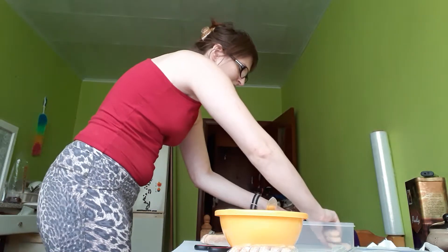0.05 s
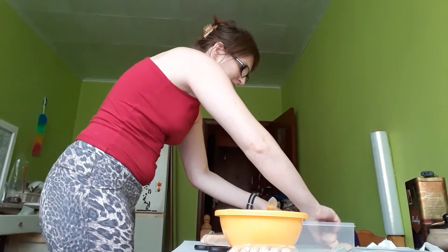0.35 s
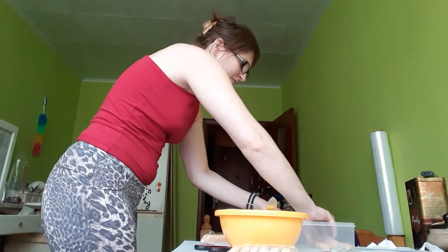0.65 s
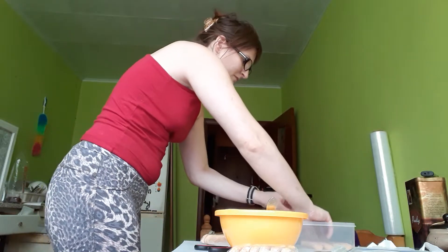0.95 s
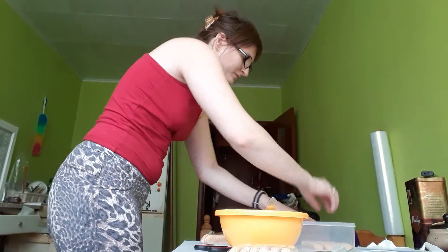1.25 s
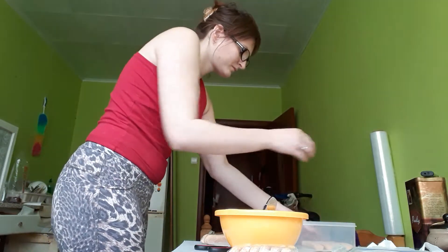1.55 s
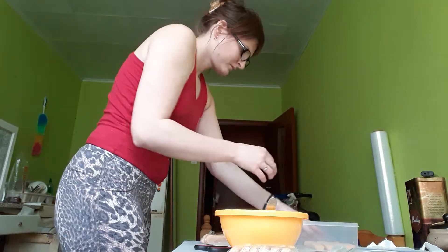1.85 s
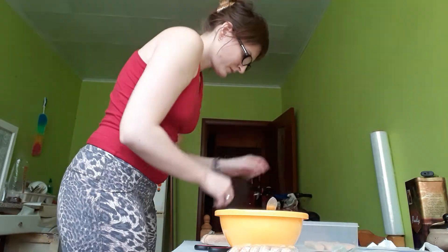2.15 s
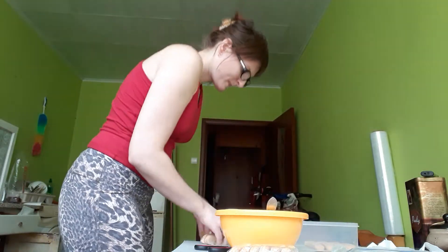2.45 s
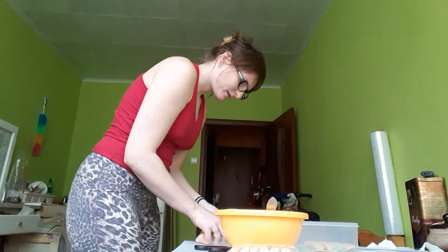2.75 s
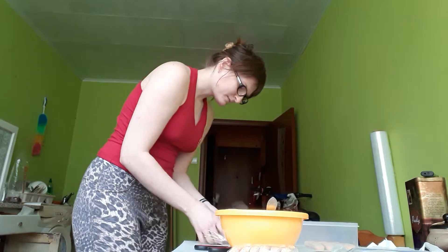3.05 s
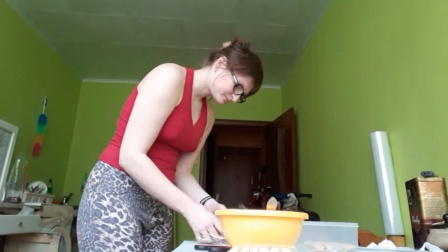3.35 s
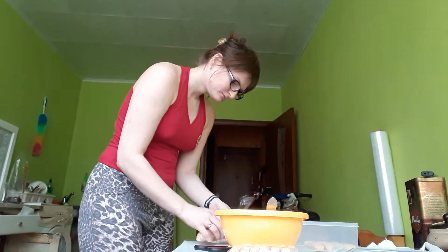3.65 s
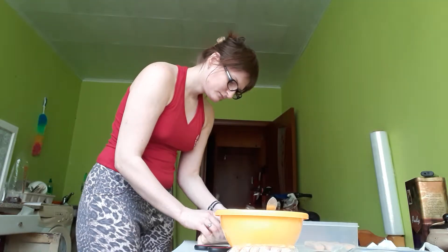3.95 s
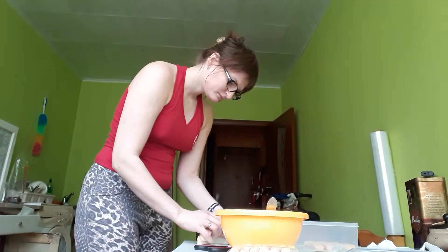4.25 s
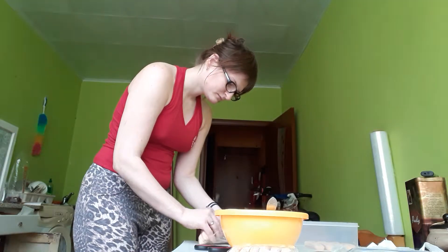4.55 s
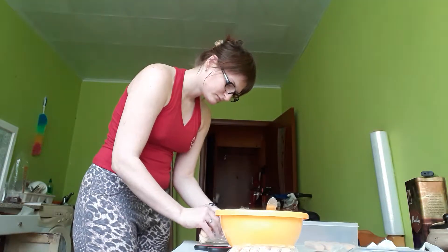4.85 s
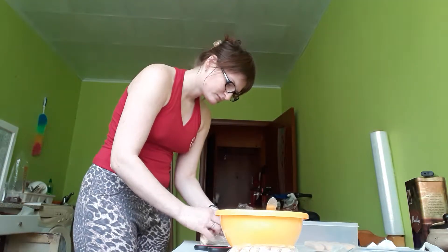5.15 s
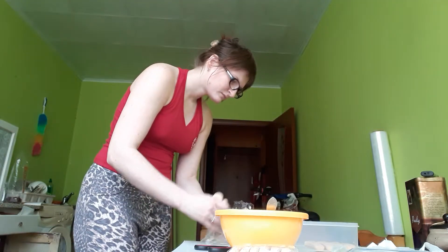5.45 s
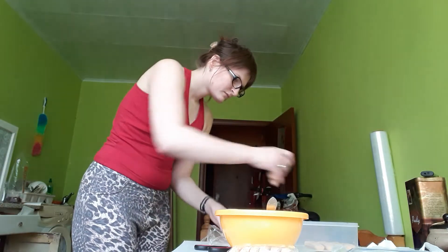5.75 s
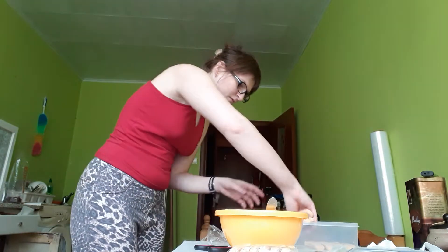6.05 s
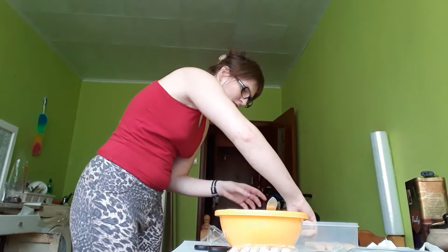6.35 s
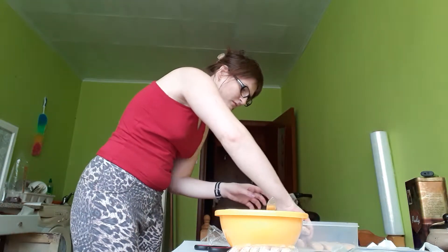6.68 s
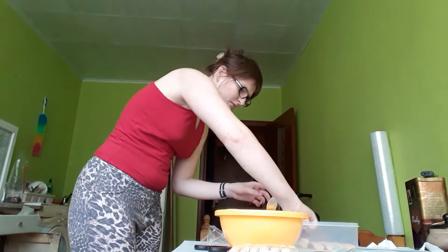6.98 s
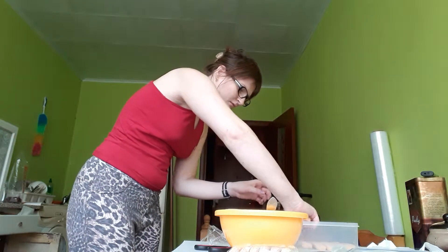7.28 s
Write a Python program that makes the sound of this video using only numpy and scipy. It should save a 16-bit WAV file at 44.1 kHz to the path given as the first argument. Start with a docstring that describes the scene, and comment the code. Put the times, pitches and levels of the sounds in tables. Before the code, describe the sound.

Dry biscuits are nudged around in a plastic box, making hollow knocks and short sandy scrapes. A hand then digs in a thin plastic bag, which crinkles and ticks as biscuits rub inside, with a few light bumps against a bowl. More biscuits drop into the box and are pushed into place. The sounds are close, with the short echo of a small kitchen and a faint fridge hum.

```python
"""Ladyfingers into a plastic box

Dry biscuits are nudged about in a plastic box on a kitchen table; each contact rings its hollow floor.
A hand digs more out of a crinkling plastic bag, bumps the bowl beside it and drops them into the box.
The small hard-walled kitchen echoes every sound, and a fridge hums."""
import sys
import numpy as np
from scipy import signal
from scipy.fft import rfft, irfft, next_fast_len
from scipy.io import wavfile
from scipy.ndimage import map_coordinates

SR = 44100
rng = np.random.default_rng(int(sys.argv[2]) if len(sys.argv) > 2 else 0)


def unload_wav(signal):
    """Save mono or channel-first audio to the path in sys.argv[1] as 16-bit WAV at rate SR, clipped to [-1, 1]."""
    wavfile.write(
        sys.argv[1],
        SR,
        np.round(np.clip(np.atleast_2d(signal).T, -1, 1) * 32767).astype(np.int16),
    )


N = 322674

# cracking sugar crust: (frequency [Hz], level [dB])
CRUST_SPECTRUM = [(100, -50.5), (300, -21.5), (1200, 7.5), (1950, 3), (2370, 4.5), (2800, 2), (4100, -4.5),
                  (5000, -16.5), (8000, -19), (12000, -31.5), (16000, -34)]
# snapping plastic: (frequency [Hz], level [dB])
CREASE_SPECTRUM = [(100, -43), (400, -34), (1200, -52), (2500, -6), (6500, 7.5), (10000, 7.5),
                   (16000, -10.5)]


def amp(db):
    """Decibels to gain."""
    return 10 ** (np.asarray(db) / 20)


def along(points, hz):
    """Interpolate (frequency [Hz], value) points on a log axis."""
    knots_hz, values = np.transpose(points)
    return np.interp(np.log(hz + 1), np.log(knots_hz), values)


def wobble(rate_hz):
    """Smooth random curve, rate_hz knots a second."""
    knots = rng.standard_normal(int(N * rate_hz / SR) + 4)
    return map_coordinates(knots, [np.arange(N) * rate_hz / SR])


def filtered(x, response):
    """Apply a frequency response."""
    n = x.shape[-1]
    size = next_fast_len(n + SR // 10)
    return irfft(rfft(x, size) * response(np.fft.rfftfreq(size, 1 / SR)), size)[..., :n]


def coloured(x, spectrum):
    """Impose a spectrum; scale to rms 1."""
    shaped = filtered(x, lambda hz: amp(along(spectrum, hz)))
    return shaped / np.sqrt(np.mean(shaped ** 2) + 1e-20)


def low_cut(x, corner_hz):
    """Small light bodies radiate little bass."""
    return signal.sosfilt(signal.butter(2, corner_hz, "highpass", fs=SR, output="sos"), x)


def add(track, time_s, sound):
    """Mix a stereo sound into the track."""
    part = track[:, max(0, round(time_s * SR)):][:, :sound.shape[1]]
    part += sound[:, :part.shape[1]]


def onset(rise_s):
    """Build-up of contact force."""
    return 1 - np.exp(-(np.arange(SR // 2) / SR / rise_s) ** 2)


def fade(t60_s):
    """Half a second of exponential decay."""
    return amp(-60 * np.arange(SR // 2) / SR / t60_s)


def stroke(start_s, length_s, rise_share, release_s, sag_db=4.5):
    """Envelope of a hand move: press, ease off, let go."""
    t = np.maximum(np.arange(N) / SR - start_s, 0)
    press = np.minimum(t / (rise_share * length_s), 1)
    ease = amp(-sag_db * np.minimum(t / length_s, 1))
    release = np.exp(-np.clip(t - length_s, 0, 1) / release_s)
    return press * ease * release


def ring(modes, scatter_db, detune):
    """Struck modes at peak 1; contact point and load reweight and retune them on each hit."""
    t = np.arange(SR // 2) / SR
    x = np.zeros(len(t))
    for k, (hz, db, t60_s) in enumerate(modes):
        gain = (-1) ** k * amp(db + scatter_db * rng.normal())
        tuned_hz = hz * (1 + detune * rng.normal())
        x += gain * fade(t60_s) * np.sin(2 * np.pi * tuned_hz * t)
    return x / np.abs(x).max()


def burst(spectrum, t60_s):
    """Decaying noise, starting near rms 1."""
    decay = fade(t60_s)
    crack = coloured(rng.standard_normal(SR // 2), spectrum) * decay
    return crack * np.linalg.norm(decay) / np.linalg.norm(crack)


def grains(spectrum, rate_hz, spread_db):
    """Random impulses of varying size, coloured, at rms 1."""
    strikes = rng.random(N) < rate_hz / SR
    signs = np.sign(rng.standard_normal(N))
    sizes = amp(spread_db * np.clip(rng.standard_normal(N), -2, 2))
    return coloured(strikes * signs * sizes, spectrum)


def placed(x, lead_ms, wet_db, pan_db, build_s):
    """Mono to stereo: direct path plus kitchen echoes. Positive lead and pan favour the left."""
    # room decay: (frequency [Hz], t60 [s])
    kitchen_decay = [(150, 0.63), (400, 0.23), (1000, 0.39), (3000, 0.36), (7000, 0.26), (15000, 0.19)]
    hz, t, noise = signal.stft(rng.standard_normal((2, SR // 2)), SR, nperseg=256)
    coherence = .95 * np.sinc(hz / 1250)  # close microphones share only long waves
    weights = np.sqrt([1 + coherence, 1 - coherence])[:, :, None]
    decay = amp(-60 * t / along(kitchen_decay, hz)[:, None])
    mid, side = signal.istft(noise * weights * decay, SR, nperseg=256)[1]
    build = np.minimum(np.arange(len(mid)) / SR / build_s, 1)
    tail = np.array([mid + side, mid - side]) * build
    echoes = signal.fftconvolve(x[None], tail / np.linalg.norm(tail[0]), axes=1)[:, :len(x)]
    direct = filtered(x, lambda hz: np.exp(1j * np.pi * np.outer([1, -1], hz) * lead_ms / 1000))
    return direct * amp([[pan_db / 2], [-pan_db / 2]]) + amp(wet_db) * echoes


def roaming(x, lead_ms, wet_db, pan_db, build_s):
    """Shifting source: new room paths every 50 ms."""
    out, step = np.zeros((2, N)), SR // 20
    for start in range(0, N, step):
        piece = x[start:start + step]
        if np.abs(piece).max() > 1e-5:
            padded = np.pad(piece, (0, SR // 3))
            shifted_ms = lead_ms + 0.05 * rng.normal()
            add(out, start / SR, placed(padded, shifted_ms, wet_db, pan_db, build_s))
    return out


def biscuit_slides():
    """Pushed biscuits stick and slip: the box rasps, the sugar scratches."""
    # pushes: (time [s], length [s], rasp [dB], scratch [dB])
    pushes = [(-.04, 0.19, -53, -59.5), (0.194, .19, -56.5, -56), (0.394, 0.051, -42, -56),
              (.54, 0.11, -45.5, -63.5), (0.69, 0.1, -38.5, -53.5), (0.837, 0.14, -46.5, -68),
              (0.998, 0.089, -53.5, -89.5), (1.529, 0.12, -66.5, -70), (1.595, 0.088, -42.5, -40),
              (1.694, 0.05, -39.5, -55), (6.296, 0.11, -60, -90), (6.457, 0.075, -45.5, -84),
              (6.494, 0.117, -38, -46.5), (6.841, 0.068, -40.5, -85), (6.909, 0.16, -44.5, -63.5),
              (7.109, 0.079, -43, -69), (7.236, 0.045, -40.5, -57.5)]
    # hollow box rasp: (frequency [Hz], level [dB])
    rasp_spectrum = [(30, -50.5), (150, -19), (300, -9.5), (500, -3.5), (740, 3), (1000, -6.5), (1600, -15),
                     (2500, -30.5), (4000, -48), (9000, -42)]
    # sandy sugar scratch: (frequency [Hz], level [dB])
    scratch_spectrum = [(200, -41), (800, 6.5), (1500, 3), (2500, 0), (4200, -4), (5500, -12),
                        (8000, -16.5), (11000, -22.5), (16000, -30)]
    rasp, scratch = np.zeros((2, N))
    for time_s, length_s, rasp_db, scratch_db in pushes:
        push = stroke(time_s, length_s, rise_share=0.18, release_s=0.013)
        rasp += amp(rasp_db - 2) * push
        scratch += amp(scratch_db + 1) * push
    rasp *= grains(rasp_spectrum, rate_hz=1000, spread_db=4.5)
    scratch *= grains(scratch_spectrum, rate_hz=3000, spread_db=7)
    friction = (rasp + scratch) * amp(0.31 * wobble(55))
    return roaming(friction, lead_ms=-0.1, wet_db=-2, pan_db=0.5, build_s=0.0062)


def fridge():
    """Steady hum, drifting slightly in level and phase."""
    # hum partials: (frequency [Hz], level [dB])
    partials = [(70, -83), (100, -66.5), (140, -76.5), (285, -91.5)]
    t = np.arange(N) / SR
    hum = np.zeros(N)
    for hz, db in partials:
        gain = np.sqrt(2) * amp(db + 0.34 * wobble(1.5))
        hum += gain * np.sin(2 * np.pi * hz * t + 0.05 * wobble(1.9))
    return hum * amp([[-.5], [.5]])


def room_air():
    """Faint air and microphone hiss, near mono in the bass."""
    # noise floor: (frequency [Hz], level [dB])
    air_spectrum = [(12, -60), (20, -33), (43, -24), (70, -15), (101, -4.5), (123, -9.5), (187, -21.5),
                    (285, -21.5), (422, -33.5), (1370, -35), (1910, -36), (5530, -40.5), (13500, -40),
                    (16000, -44)]
    width = [(100, -13), (400, -0.5), (1200, 0.5)]  # (frequency [Hz], side gain [dB])
    mid, side = coloured(rng.standard_normal((2, N)), air_spectrum)
    side = filtered(side, lambda hz: amp(along(width, hz)))
    return amp(-70.5) * np.array([mid + side, mid - side])


def box_knocks():
    """A biscuit lands on one end, then the other: floor and rim ring, walls rattle, crust cracks."""
    # landings: (time [s], level [dB], relative wall rattle [dB], crispness [dB])
    landings = [(.099, -39.5, -8, -29), (.18, -34, -11, -19.5), (0.399, -28.5, -3, -10.5),
                (0.5588, -12, -9, -15), (.579, -18, -21, -15), (0.6151, -17.5, -12.5, -18),
                (.745, -20.5, -10, -31.5), (0.777, -28.5, -33, -29), (.801, -27.5, -17, -26.5),
                (0.838, -28.5, -2.5, -17.5), (.904, -27.5, -0.5, -9.5), (1.322, -58.5, -8, -25),
                (1.5985, -22, -25, -16.5), (1.607, -13.5, -16, -24.5), (1.644, -19, -17.5, -12),
                (1.714, -35, -2, -21.5), (6.322, -39, -22, -54.5), (6.503, -11.5, -10, -8),
                (6.515, -14.5, -8, -2.5), (6.845, -24, -12.5, -42), (6.961, -22, -10, -19),
                (7.133, -29, -10.5, -28), (7.236, -30.5, -13, -16)]
    # box floor: (frequency [Hz], level [dB], t60 [s])
    floor_modes = [(514, -23, 0.12), (630, -10, 0.056), (740.5, -1.5, 0.047), (928.5, -8, 0.035),
                   (1055, -16.5, 0.057)]
    # dense, damped wall modes: (frequency [Hz], level [dB])
    wall_spectrum = [(100, -30), (185, -37.5), (250, -3.5), (320, -13.5), (400, -1), (520, 3), (700, -9.5),
                     (1000, 2), (1300, -1), (1650, -0.5), (1950, -18), (2400, -11.5), (4000, -42.5),
                     (9000, -75.5)]
    # stiff rim, woken by hard contacts: (frequency [Hz], level [dB], t60 [s])
    rim_modes = [(1300, -1, .035), (1640, -3, .04), (1880, -6, .04), (2320, 0, .05), (2460, -5, .04)]
    rock_s, far_end_db = 0.009, -9
    out = np.zeros((2, N))
    for first_s, level_db, wall_db, crisp_db in landings:
        second_s = first_s + rock_s * np.exp(0.18 * rng.normal())
        force = onset(rise_s=0.00038 * amp(-.3 * crisp_db))  # dull contacts build more slowly
        for time_s, db in [(first_s, level_db), (second_s, level_db + far_end_db)]:
            floor = ring(floor_modes, scatter_db=3.5, detune=0.0056) * force
            walls = amp(wall_db) * burst(wall_spectrum, t60_s=0.037) * force
            crust = burst(CRUST_SPECTRUM, t60_s=0.023)
            rim = ring(rim_modes, scatter_db=2, detune=.01)
            knock = amp(db - 2) * low_cut(floor, corner_hz=240)
            rattle = amp(db - 2) * low_cut(walls + amp(crisp_db - 4) * (crust + rim), corner_hz=190)
            # the floor faces the microphones; the rest scatters into the room
            add(out, time_s, placed(knock, lead_ms=-0.13, wet_db=-6, pan_db=2, build_s=0.0037))
            add(out, time_s, placed(rattle, lead_ms=-0.11, wet_db=3.5, pan_db=-2.5, build_s=0.0017))
    return out


def hand_in_bag():
    """Film, rub and shuffle gains: steady stirring plus firmer grips."""
    # stirring: (time [s], crinkle [dB], relative shuffle [dB])
    stirring = [(2.40, -85.5, -7), (2.439, -61.5, 1), (2.59, -65.5, 1), (2.66, -58.5, 2),
                (2.98, -56.5, -11.5), (3.3, -48, -12.5), (3.72, -56.5, -25), (4.05, -52.5, -16),
                (5.2, -54.5, -12), (5.53, -56, -22), (5.66, -69, -17.5), (5.8, -68.5, -15), (6.0, -87, -3)]
    # grips: (time [s], length [s], crinkle [dB], relative shuffle [dB])
    grips = [(2.47, 0.066, -64, 14.5), (2.603, .1, -51.5, -2.5), (2.83, 0.049, -55, -5),
             (3.008, 0.076, -38, -10), (3.209, 0.13, -43, -11), (3.354, 0.042, -47, -6),
             (3.414, .12, -49.5, -8), (3.595, 0.074, -51, -22), (3.768, .12, -45, -14.5),
             (3.923, 0.13, -40, -7.5), (4.141, 0.089, -48, -6), (4.3, 0.047, -58.5, 7),
             (4.499, 0.084, -46, -8), (4.711, 0.059, -37, -5), (4.861, 0.038, -49.5, -3),
             (4.996, 0.089, -46, -11.5), (5.285, 0.051, -49.5, -8.5), (5.66, 0.021, -52.5, -25),
             (5.868, 0.031, -60, -19), (6.036, 0.051, -59, -4)]
    t = np.arange(N) / SR
    stir_s, stir_db, stir_shuffle_db = np.transpose(stirring)
    film = amp(np.interp(t, stir_s, stir_db, left=-140, right=-140))
    shuffle = film * amp(np.interp(t, stir_s, stir_shuffle_db))
    for time_s, length_s, db, shuffle_db in grips:
        grip = amp(db) * stroke(time_s, length_s, rise_share=0.4, release_s=0.015)
        film = np.hypot(film, grip)
        shuffle = np.hypot(shuffle, amp(shuffle_db) * grip)
    rub = film * (shuffle / film) ** 0.23  # mostly follows the film
    return film, rub, shuffle


def bag_rustle():
    """Thin film crinkles in clumps of tiny buckles; biscuits rub and shuffle inside."""
    # crinkling film: (frequency [Hz], level [dB])
    film_spectrum = [(100, -50), (500, -70), (1500, -1), (3000, 2.5), (4800, -0.5), (7800, 1),
                     (11000, -1.5), (14000, -4.5), (16000, -6.5)]
    # rubbing biscuits: (frequency [Hz], level [dB])
    rub_spectrum = [(300, -56), (700, -2.5), (950, -0.5), (1250, 0), (1800, 5.5), (3000, -12),
                    (5000, -10.5), (12000, -30.5)]
    # hollow shuffle of biscuits: (frequency [Hz], level [dB])
    shuffle_spectrum = [(60, -18), (140, -9.5), (250, -4), (400, 2), (650, -3), (1000, 10), (2000, -41.5)]
    film, rub, shuffle = hand_in_bag()
    clumps = wobble(40)
    buckling = amp(1 + 1.4 * clumps + 2.7 * wobble(170))
    crinkle = film * buckling * grains(film_spectrum, rate_hz=4000, spread_db=8)
    crackle = film * amp(-8.5) * grains(CREASE_SPECTRUM, rate_hz=110, spread_db=3)
    small_snaps = film * amp(-12) * grains(CREASE_SPECTRUM, rate_hz=9.75, spread_db=1.5)
    rubbing = rub * amp(-2 + clumps) * grains(rub_spectrum, rate_hz=1500, spread_db=10.5)
    shuffling = shuffle * amp(-1 + 1.8 * clumps) * grains(shuffle_spectrum, rate_hz=450, spread_db=7)
    out = roaming(crinkle, lead_ms=0.034, wet_db=0, pan_db=2.5, build_s=0.0012)
    out += placed(crackle + small_snaps, lead_ms=0.052, wet_db=-1.5, pan_db=5.5, build_s=0.0062)
    return out + roaming(rubbing + shuffling, lead_ms=0.17, wet_db=-1.5, pan_db=0.5, build_s=0.0015)


def bowl_bumps():
    """Hand and biscuits bump the bowl: its shell rings, the table thuds, crust cracks."""
    # contacts: (time [s], level [dB], crispness [dB], thud [dB])
    bumps = [(2.483, -33.5, -19.5, -3), (2.505, -30, -2.5, -12.5), (2.603, -30.5, -12, -31),
             (3.375, -43.5, 3, -11), (4.004, -27.5, -6, -31), (5.665, -51.5, 10, -3.5),
             (6.048, -22, -16.5, -16), (6.061, -22.5, -14, -3), (6.088, -24.5, -12.5, -12),
             (6.112, -22, -4.5, -15), (6.129, -27.5, -4, -2)]
    # table top: (frequency [Hz], level [dB], t60 [s])
    table_modes = [(130, -7, .09), (252, 0, .09)]
    # bowl shell: (frequency [Hz], level [dB], t60 [s])
    bowl_modes = [(359, -13.5, 0.11), (482, 1, 0.02), (580, -6.5, 0.055), (730, -2.5, 0.026),
                  (950, -1.5, 0.024), (1526, -3, 0.025)]
    out = np.zeros((2, N))
    for time_s, db, crisp_db, thud_db in bumps:
        thud = amp(thud_db - 5.5) * ring(table_modes, scatter_db=2, detune=.02)
        shell = ring(bowl_modes, scatter_db=4, detune=0.031)
        crust = amp(crisp_db - 3) * burst(CRUST_SPECTRUM, t60_s=0.051)
        force = onset(rise_s=0.0018 * amp(-.6 * crisp_db))  # fleshy contacts build slowly
        bump = amp(db - 2.5) * low_cut((shell + thud + crust) * force, corner_hz=69.4)
        add(out, time_s, placed(bump, lead_ms=-0.064, wet_db=0, pan_db=0.5, build_s=0.0033))
    return out


def plastic_ticks():
    """Sharp plastic ticks close by: the bag's creases snap; the last is a crisp crack in the box."""
    # ticks: (time [s], level [dB])
    ticks = [(2.5651, -39), (3.3754, -28), (3.4625, -31), (3.4875, -29), (3.7778, -31), (4.3126, -31),
             (4.3904, -31), (4.4513, -31), (4.5301, -23), (4.6518, -27), (4.6763, -29), (4.8618, -29),
             (5.0514, -28), (5.1866, -29), (5.4809, -30), (5.665, -33), (5.8701, -48), (6.0033, -41),
             (7.2459, -43)]
    out = np.zeros((2, N))
    for time_s, db in ticks:
        tick = amp(db + 1.5) * burst(CREASE_SPECTRUM, t60_s=.006)
        add(out, time_s, placed(tick, lead_ms=.05, wet_db=-2.5, pan_db=2.5, build_s=.007))
    return out


def scene():
    """Box, bag and bowl in the humming kitchen."""
    return (biscuit_slides() + fridge() + room_air() + box_knocks()
            + bag_rustle() + bowl_bumps() + plastic_ticks())


def record(dry):
    """Brick-wall low-pass at 16 kHz."""
    return filtered(dry, lambda hz: hz < 16000)


dry = scene()
out = record(dry)
unload_wav(out)
```